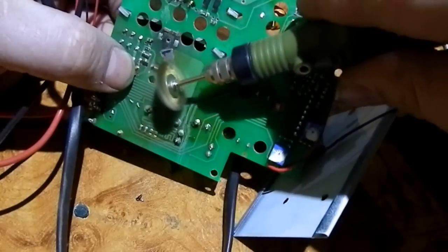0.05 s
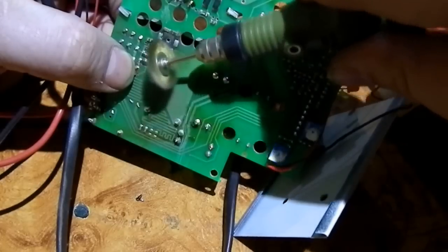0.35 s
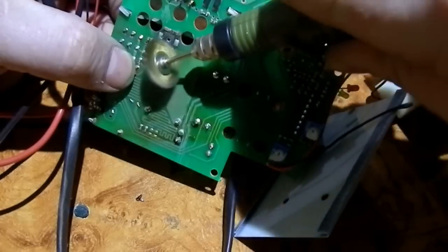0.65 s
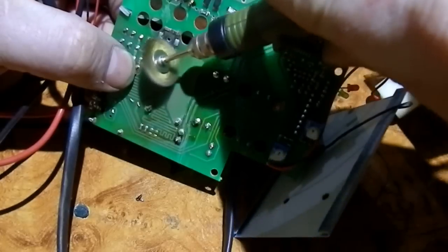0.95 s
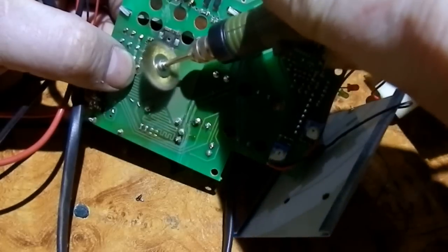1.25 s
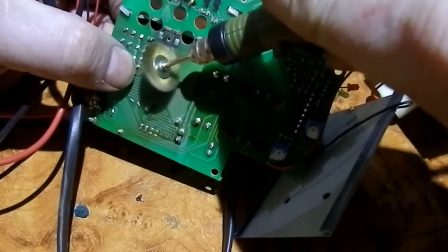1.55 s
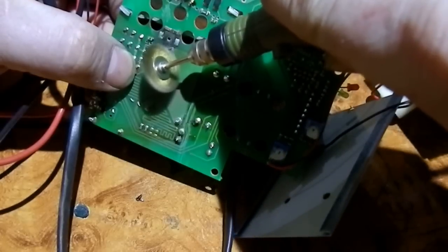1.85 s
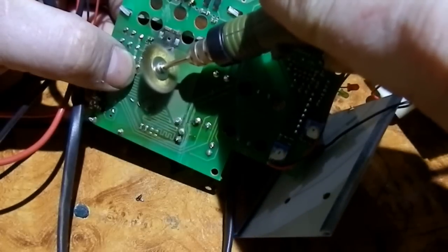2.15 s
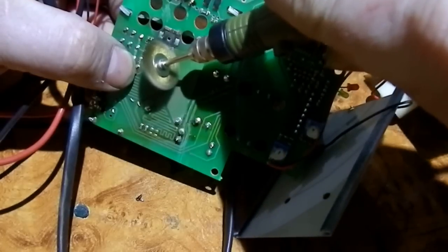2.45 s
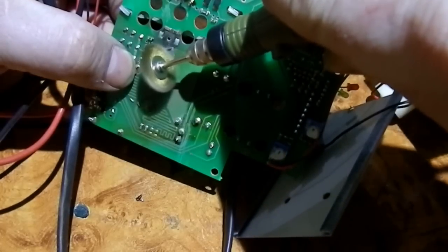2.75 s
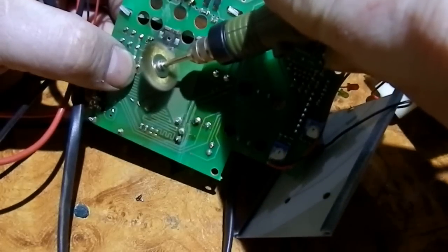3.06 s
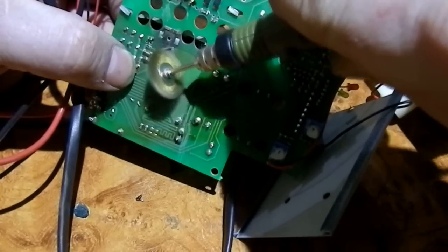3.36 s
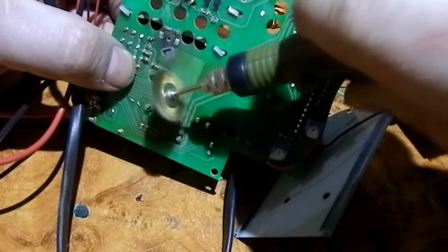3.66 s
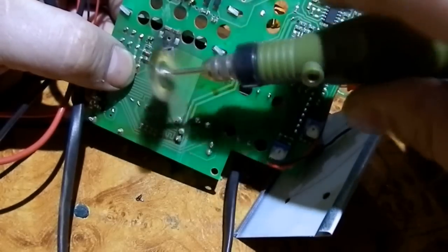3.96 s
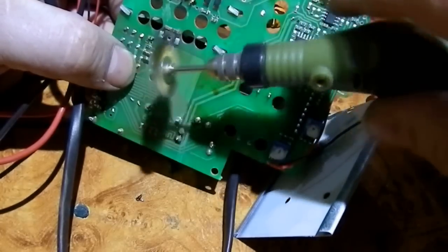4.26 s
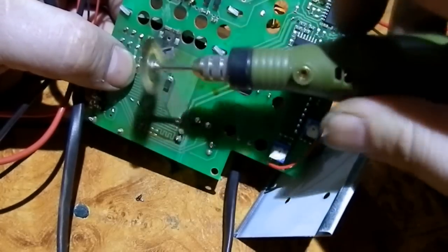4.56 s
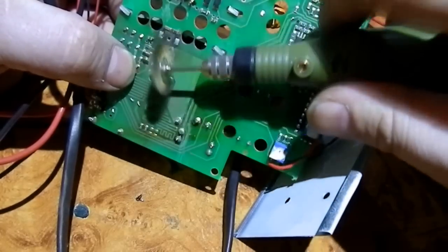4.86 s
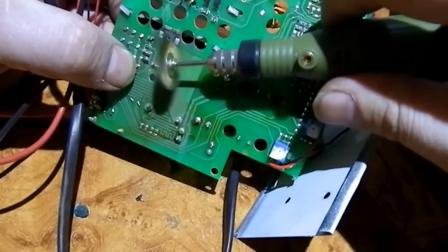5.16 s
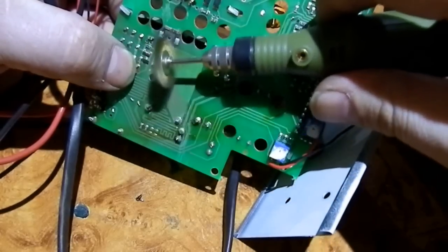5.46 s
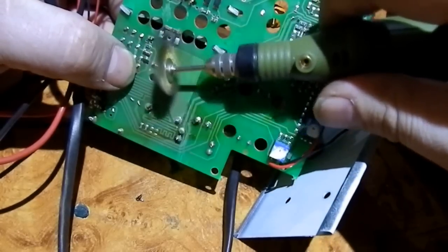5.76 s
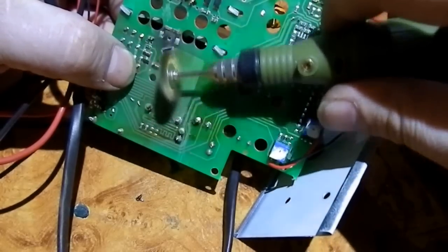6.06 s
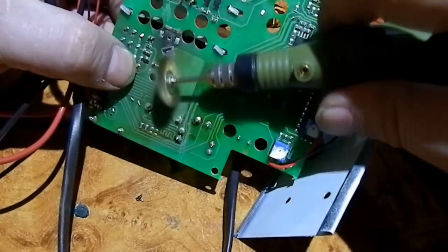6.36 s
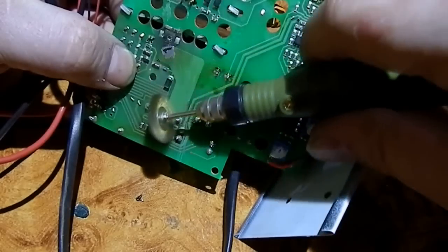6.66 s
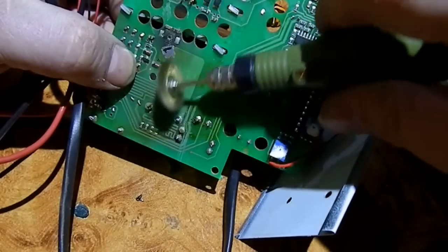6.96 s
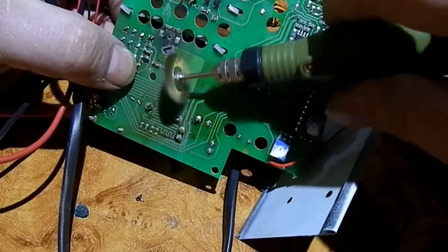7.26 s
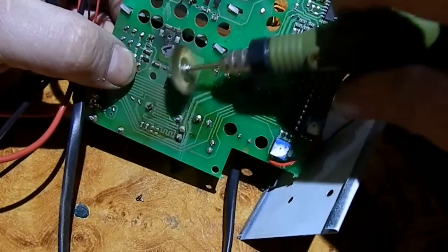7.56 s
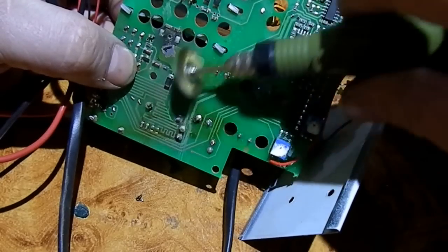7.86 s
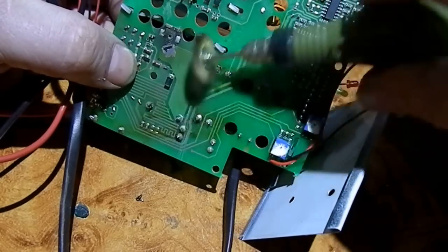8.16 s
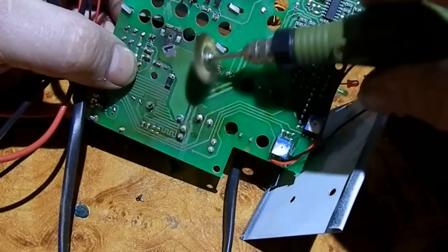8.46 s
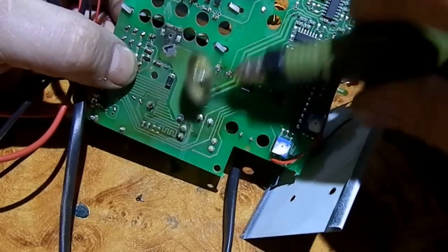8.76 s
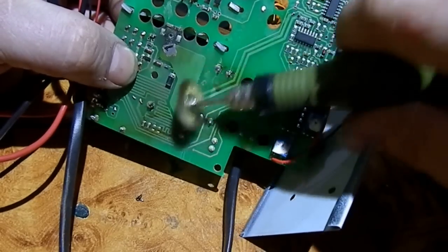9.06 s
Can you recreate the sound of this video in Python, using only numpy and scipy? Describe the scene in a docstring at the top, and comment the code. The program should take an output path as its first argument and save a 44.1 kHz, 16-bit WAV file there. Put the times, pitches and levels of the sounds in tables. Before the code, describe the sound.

Close, bright wire brush hiss on a circuit board, over a small motor that sags under pressure and whines when lifted.

```python
"""Wire wheel on a circuit board

A small rotary tool scrubs a circuit board, heard up close. The weak motor sags whenever the wheel
is pressed down; the board hums and buzzes at multiples of the shaft speed, and the wires hiss and
ring. Midway the wheel lifts and only grazes while the free motor whines. It bites again with a
squeal, then works with its rim in short strokes."""
import sys
import numpy as np
from scipy import signal
from scipy.fft import rfft, irfft, next_fast_len
from scipy.io import wavfile
from scipy.ndimage import uniform_filter1d, map_coordinates

SR = 44100
rng = np.random.default_rng(int(sys.argv[2]) if len(sys.argv) > 2 else 0)


def to_wav(s):
    """Save 16-bit WAV."""
    ch = np.atleast_2d(s).T  # columns
    pcm = np.round(np.clip(ch, -1, 1) * 32767)  # PCM
    wavfile.write(sys.argv[1], SR, pcm.astype(np.int16))


N = 410571
T = np.arange(N) / SR


def amp(db):
    """Decibels to gain."""
    return 10 ** (np.asarray(db) / 20)


def unit(x):
    """Scale to rms 1."""
    return x / np.sqrt(np.mean(x ** 2) + 1e-20)


def steady(x):
    """Hold the rms near 1 at every moment."""
    return x / np.sqrt(np.abs(uniform_filter1d(x * x, size=3000)) + 1e-12)


def along(points, hz):
    """Read (freq_hz, value) points on a log frequency axis."""
    freqs, values = np.transpose(points)
    return np.interp(np.log(hz + 1), np.log(freqs + 1), values)


def curves(rows):
    """One automation curve for each column after the time."""
    times, *columns = np.transpose(rows)
    return [np.interp(T, times, column) for column in columns]


def wobble(rate):
    """A random curve of rms 1 with rate knots a second."""
    knots = rng.standard_normal(int(T[-1] * rate) + 2)
    return unit(np.interp(T * rate, np.arange(len(knots)), knots))


def swell(middle_s, length_s):
    """A smooth rise from 0 to 1 and back."""
    return np.cos(np.pi * np.clip((T - middle_s) / length_s, -.5, .5)) ** 2


def bursts(rows, attack_s, t60_s):
    """An envelope of quick hits that die away."""
    out = np.zeros(N)
    for start_s, db in rows:
        start = int(start_s * SR)
        t = T[:min(SR // 2, N - start)]
        out[start:start + len(t)] += amp(db - 60 * t / t60_s) * (1 - np.exp(-t / attack_s))
    return out


def filtered(x, response):
    """Shape x with a gain at each frequency."""
    size = next_fast_len(N + SR // 2)
    return irfft(rfft(x, size) * response(np.fft.rfftfreq(size, 1 / SR)), size)[:N]


def coloured(x, spectrum, modes=()):
    """A broad EQ curve plus narrow bells (centre_hz, width_hz, gain_db), scaled to rms 1."""
    def bells(hz):
        return sum(db / (1 + (2 * (hz - centre) / width) ** 2) for centre, width, db in modes)
    return unit(filtered(x, lambda hz: amp(along(spectrum, hz) + bells(hz))))


def bristles(turns, memory, size):
    """Roughness around the wheel, size values a turn; each turn partly repeats as the wires bend."""
    fresh = rng.standard_normal((int(turns[-1]) + 2, size))
    pattern = signal.lfilter([1], [1, -np.clip(memory, 0, .98)], fresh, axis=0)
    return unit(map_coordinates(pattern.ravel(), [turns * size], order=3, mode="nearest"))


def harmonics(table, speed, turns, body_db, rough, rate):
    """Multiples of the shaft speed sweep through a body's EQ, each fluttering by itself."""
    out = np.zeros(N)
    for multiple, db in table:
        gain = amp(db + body_db(multiple * speed)) * (1 + rough * wobble(rate))
        out += gain * np.sin(2 * np.pi * (multiple * turns + rng.random()) + rough * wobble(rate))
    return steady(out)


# Shaft speed as the hand leans on the tool, before the strokes: time_s, speed_hz
SHAFT_SPEED = [(0, 143), (.05, 153), (.17, 192), (.23, 193), (.33, 175.5), (.46, 170.9), (.56, 152.2),
               (.73, 170.5), (.85, 140.5), (1.05, 132), (1.17, 97.5), (1.3, 110.4), (1.46, 102.3),
               (1.57, 128.5), (1.74, 114.2), (2.11, 112.6), (2.38, 94), (2.55, 119.5), (2.71, 163),
               (2.93, 145.2), (3.11, 143.3), (3.3, 126), (3.42, 133), (3.5, 175), (3.6, 251), (3.72, 262.4),
               (4.91, 262.9), (4.98, 251), (5.09, 260), (5.41, 194.6), (5.77, 190.2), (5.84, 178),
               (5.98, 198.2), (6.25, 185.9), (6.37, 155.4), (6.52, 146.4), (6.74, 169.5), (7.3, 159.6),
               (7.65, 174.2), (8, 174.3), (8.3, 168), (9.31, 166)]
# Rim strokes drag the shaft and choke the wires: slowest_s, sag_hz, fall_s, recovery_s, choke_db
RIM_STROKES = [(6.853, 11, .056, .177, 1), (7.118, 41, .125, .114, 1), (7.468, 32, .071, .16, 6),
               (7.77, 18, .075, .216, 1), (8.07, 18, .06, .21, 4.5), (8.345, 5, .045, .1, 4),
               (8.482, 15, .14, .073, 0), (8.635, 24, .072, .131, 6), (8.874, 36, .069, .151, 9),
               (9.118, 38, .073, .16, 9)]

def shaft_speed():
    """Turns per second: each stroke drags the weak motor down, then it recovers."""
    speed, = curves(SHAFT_SPEED)
    for s, sag, fall, recovery, _ in RIM_STROKES:
        speed = speed - sag * np.interp(T, [s - fall, s, s + recovery], [0, 1, 0])
    return uniform_filter1d(speed, size=1200, mode="nearest") * (1 + .0007 * wobble(40))


# The grazing wheel skips clear of the board: middle_s, dip_db
WHEEL_SKIPS = [(3.755, 2), (4.275, 4.5), (4.93, 3)]

def wheel_touch(graze):
    """Quick changes of contact in dB: an uneven board, grazing bounces and skips, choking strokes."""
    bounce_hz, lightest_s, choke_lag_s = 13.5, 4.272, 0.0038
    uneven = 0.98 * wobble(27)
    bounce = -graze * np.cos(2 * np.pi * bounce_hz * (T - lightest_s))
    skips = sum(db * swell(s, length_s=0.048) for s, db in WHEEL_SKIPS)
    chokes = sum(db * swell(s + choke_lag_s, length_s=0.11) for s, *_, db in RIM_STROKES)
    return uneven + bounce - skips - chokes


# The held board hums most when the shaft turns near its resonance: speed_hz, level_db
HUM_RESONANCE = [(95, -45), (103, -37), (112, -30), (130, -29.5), (147, -24), (155, -25), (162, -31.5),
                 (173, -50), (260, -56)]

def board_hum(speed, turns, rim, effort_db):
    """Unbalance shakes the board once a turn, harder on the rim."""
    lagged_speed = np.interp(T - 0.019, T, speed)  # the resonance needs time to follow
    level_db = along(HUM_RESONANCE, lagged_speed) + 6 * rim + 1.25 * effort_db + .7 * wobble(30)
    return amp(level_db) * unit(np.sin(2 * np.pi * turns))


# Harmonics of the loaded wheel: shaft_multiple, gain_db
BUZZ_HARMONICS = [(2, -4), (3, 5.5), (4, 11.5), (5, 14.5), (6, 14.5), (7, 8.5), (8, 7.5), (9, 9),
                  (10, 10.5), (11, 6), (12, 6), (13, 9.5), (14, 9.5), (15, 16), (16, 6), (17, 13),
                  (18, 4.5), (20, 6), (21, -24)]
# Body of the board under the flat wheel, and under the rim: freq_hz, gain_db
BOARD_EQ = [(200, -1), (330, -1), (450, 0), (570, 2), (720, -13), (810, -10), (950, -9.5), (1100, -10.5),
            (1300, -3.5), (1600, 0), (1900, -8.5), (2400, -7.5), (3200, -5.5), (5000, 15)]
BOARD_RIM_EQ = [(200, 17), (330, -2), (470, -3.5), (650, 1), (810, 1.5), (950, -13), (1100, -8), (1400, 3),
                (1650, -1.5), (1900, -15), (2400, -11), (3200, 4), (5000, 0)]

def board_buzz(speed, turns, rim, effort_db):
    """The loaded wheel buzzes the board, turning ragged as it grabs or lets go."""
    def body_db(hz):
        return (1 - rim) * along(BOARD_EQ, hz) + rim * along(BOARD_RIM_EQ, hz)
    work_speed_hz, full_drag_hz_per_s = 150, 360
    braking = -np.gradient(speed) * SR
    buzz = harmonics(BUZZ_HARMONICS, speed, turns, body_db, rough=0.29 + np.abs(braking) / 1400, rate=45)
    load_db = 0.68 * effort_db + 1.5 * np.log2(work_speed_hz / speed)
    rim_db = rim * (1 + 4.5 * np.clip(braking / full_drag_hz_per_s, 0, 1))  # swells under braking
    return amp(-28 + load_db + rim_db + 1.3 * wobble(25)) * buzz


# Tone of the ringing wires: freq_hz, gain_db
WIRE_EQ = [(1800, -32), (2500, -32.5), (2880, -7.5), (3280, -7), (3480, -2.5), (3680, -1), (3860, 4.5),
           (4020, -3), (4200, -1), (4430, -3.5), (4620, -18), (6000, -12), (9000, -25)]
# Harmonics of the wires' stick-slip chatter: shaft_multiple, gain_db
SQUEAL_HARMONICS = [(14, -8), (15, 6), (16, 2), (17, -4), (18, -8), (19, 4), (20, -3), (21, -7), (22, -2),
                    (23, 1), (24, -4), (25, -4), (26, 1), (27, 2), (28, -2), (29, 1), (30, -2), (31, 1),
                    (32, -3), (33, -4), (35, -5)]
# The wheel digs in for a moment: middle_s, length_s, hiss_gain_db, ring_gain_db
WHEEL_DIGS = [(.17, .14, -0.5, 3.5), (.35, 0.15, 0.5, 1.5), (1.607, 0.37, -1.5, 2.5), (2.995, .3, 0.5, 2.5),
              (3.25, 0.45, -0.5, 1), (4.955, 0.14, -2.5, 14.5), (5.16, 0.46, -1.5, 5.5),
              (6.817, 0.081, 6.5, 9), (7.257, .2, -0.5, 5.5), (7.44, .07, 6, -1), (7.88, .12, 1.5, 4.5),
              (8.138, 0.066, 1, 4.5)]

def wire_ring(speed, turns, graze, rim, sticking, contact_db):
    """Pressed wires ring near 4 kHz, and squeal when they stick and slip in step with the shaft."""
    level_db = -13 + 0.63 * contact_db + 1.4 * sticking - 25 * graze ** 3 - 11.5 * rim
    level_db += 1.36 * wobble(22)
    level_db += sum(db * swell(s, length) for s, length, _, db in WHEEL_DIGS)
    scrape = bristles(turns, memory=0.51, size=160)
    loose = steady(coloured(scrape, WIRE_EQ, modes=[(3680, 520, 8), (2940, 480, -9)]))
    squeal = harmonics(SQUEAL_HARMONICS, speed, turns, lambda hz: along(WIRE_EQ, hz), rough=0.22, rate=60)
    return amp(level_db) * (np.sqrt(1 - sticking) * loose + np.sqrt(sticking) * squeal)


# Tone of the wheel pressed flat: freq_hz, gain_db
FLAT_EQ = [(100, -20.5), (500, -20), (1600, -14.5), (2400, -13), (3500, -3.5), (4600, 1.5), (5700, -3.5),
           (6600, 1), (8000, 0.5), (9000, -1), (10800, -2.5), (12300, -0.5), (13500, -10), (15600, -12.5)]
# Narrow peaks and notches in that tone: centre_hz, width_hz, gain_db
FLAT_BELLS = [(6380, 360, 4), (7040, 160, -1), (8860, 410, 4.5), (10120, 220, 5), (10920, 190, 4.5),
              (12120, 250, -16)]

def flat_scratch(turns, sticking):
    """Wire tips scratch in tufts that return every turn; sticking locks them into gliding lines."""
    once_a_turn = np.sin(2 * np.pi * turns)
    tufts = amp(1.56 * bristles(turns, memory=0.87, size=12) + 0.42 * once_a_turn + 0.71 * wobble(70))
    loose = unit(tufts * bristles(turns, memory=0.21, size=320))
    locked = unit(amp(2 * once_a_turn) * bristles(turns, memory=.95, size=256))
    lock_share = 0.43 * sticking ** 3
    return coloured(np.sqrt(1 - lock_share) * loose + np.sqrt(lock_share) * locked, FLAT_EQ, FLAT_BELLS)


def shifting_load(x, depth_db):
    """Different wires carry the load from moment to moment, so narrow peaks come and go."""
    spectrogram = signal.stft(x, nperseg=1024)[2]
    peaks = rng.standard_normal(spectrogram.shape)
    peaks = uniform_filter1d(uniform_filter1d(peaks, size=4, axis=0), size=3, axis=0)  # across frequency
    peaks = uniform_filter1d(peaks, size=26, axis=1)  # across time
    return unit(signal.istft(spectrogram * amp(depth_db * unit(peaks)), nperseg=1024)[1][:N])


def brighten(x, top_db, crossover_hz=9500):
    """Sharper contact moves the energy into the top octave."""
    top = filtered(x, lambda hz: 1 / (1 + (crossover_hz / (hz + 1)) ** 10))
    share = np.clip(amp(top_db) ** 2, .02, .9)
    return np.sqrt(1 - share) * unit(x - top) + np.sqrt(share) * amp(-1.5) * unit(top)


def wire_hiss(turns, graze, rim, sticking, effort_db, touch_db):
    """The wires' scratch crossfades between flat, rim and grazing contact; grazing adds ring and ticks."""
    flat = flat_scratch(turns, sticking)
    edge = rim_scratch(turns)
    air, tip_ring, firmness_db = skim(turns, graze)
    pressed = shifting_load(np.sqrt(1 - rim) * flat + np.sqrt(rim) * edge, depth_db=2.47)
    scratch = np.sqrt(1 - graze) * pressed + np.sqrt(graze) * air
    graze_top_db = -2.24 + 1.15 * touch_db + 0.35 * firmness_db  # a firmer graze is brighter
    scratch = brighten(scratch, top_db=-2.5 + graze * graze_top_db)
    digs_db = sum(db * swell(s, length) for s, length, db, _ in WHEEL_DIGS)
    level_db = -11 + effort_db + touch_db + digs_db - .5 * graze
    return amp(level_db) * scratch + tip_ring + stray_catches(air)


# The wheel hits solder joints: start_s, gain_db
SOLDER_HITS = [(0.859, -26), (0.929, -23), (4.599, -16.5), (7.069, -11), (7.439, -13), (8.599, -19),
               (9.084, -13.5)]

def solder_bumps():
    """Solder joints kick the wheel and rattle the board."""
    rattle = coloured(rng.standard_normal(N), BOARD_EQ + [(9000, -40)])
    return amp(0.5) * bursts(SOLDER_HITS, attack_s=0.0031, t60_s=0.13) * rattle


# Harmonics of the free motor: shaft_multiple, gain_db
WHINE_HARMONICS = [(1, -8), (2, -26), (3, -14.5), (4, -18), (5, 0.5), (6, -7), (7, -13.5), (9, -13.5)]
# Fader ride of its whine: time_s, level_db
WHINE_LEVEL = [(3.6, -36.5), (3.94, -30.5), (4.23, -35), (4.5, -31), (5.05, -31.5)]

def motor_whine(speed, turns):
    """Freed of its load, the motor whines at multiples of the shaft speed."""
    level_db, = curves(WHINE_LEVEL)
    return amp(level_db) * harmonics(WHINE_HARMONICS, speed, turns, lambda hz: 0, rough=.13, rate=25)


# Airy tone of the grazing wheel: freq_hz, gain_db
GRAZE_EQ = [(100, -17), (1000, -18), (2800, -16), (4400, -16), (4900, -2), (5800, 2), (6300, 4.5),
            (8700, 7), (10100, 3.5), (11400, 9), (12700, 1), (13200, -9), (14300, -1), (15400, -7)]
# Fader ride of the lightly touching tips, which ring near 5 kHz: time_s, gain_db
TIP_RING_LEVEL = [(3.5, -27), (3.95, -26), (4.07, -16), (4.2, -22.5), (4.3, -37), (4.38, -18.5),
                  (4.55, -19), (4.8, -14.5), (5.15, -14)]

def skim(turns, graze):
    """A grazing wheel touches in spurts; returns whistling air, tip ring and firmness of touch in dB."""
    spurts = unit(amp(1.2 * wobble(55) + 1.7 * wobble(330)))
    air = coloured(spurts * bristles(turns, memory=0.17, size=256), GRAZE_EQ)
    tip_eq = [(4350, -28), (4800, -3), (5250, -5), (5700, -6.5), (6500, -41)]  # freq_hz, gain_db
    tips = coloured(spurts * bristles(turns, memory=0.51, size=160), tip_eq)
    air = unit(air + amp(-2.5) * spurts * whistles(turns))
    tip_db, = curves(TIP_RING_LEVEL)
    firmness_db = tip_db - np.average(tip_db, weights=graze)
    return air, amp(tip_db - 0.5) * graze * tips, firmness_db


# Whistling bands of the skimming wires: shaft_multiple, width_multiples, gain_db
WHISTLE_BANDS = [(24, 1, -2), (29, 1.2, -7), (33, 1.3, -3), (38.8, 1.5, -7), (43, 1.7, 3), (47.3, 1.7, -4),
                 (52.6, 1.7, -5), (58, 2, -10)]

def whistles(turns):
    """Narrow bands of noise ride on high multiples of the shaft speed."""
    out = np.zeros(N)
    for multiple, width, db in WHISTLE_BANDS:
        # a complex flutter spreads each line into a band
        knots = rng.standard_normal((int(turns[-1] * width) + 2, 2)) @ [1, 1j]
        smooth = signal.resample_poly(knots, 8, 1)
        flutter = np.interp(8 * turns * width, np.arange(len(smooth)), smooth)
        out += amp(db) * np.real(flutter * np.exp(2j * np.pi * multiple * turns))
    return unit(out)


# Ticks of stray wires while grazing: start_s, gain_db
CATCH_HITS = [(3.9265, 11), (4.2867, 0), (4.9571, 13)]

def stray_catches(air):
    """Stray wires catch the board in sharp spits of hiss."""
    return amp(-14) * bursts(CATCH_HITS, attack_s=.004, t60_s=0.039) * air


# Tone of the wheel on its rim: freq_hz, gain_db
RIM_EQ = [(100, -10.5), (600, -8.5), (1600, -6.5), (2300, -5.5), (3500, -13), (4600, 7.5), (5800, 1.5),
          (7500, 3), (8600, 9), (10000, 6.5), (12200, 1), (13300, -4), (14500, -4), (15500, -4.5)]
# Narrow resonances on top: centre_hz, width_hz, gain_db
RIM_BELLS = [(4630, 240, 5.7), (6550, 130, 11.3), (8300, 170, 4.3), (8780, 110, 4.5), (9860, 560, 2.6),
             (11700, 200, 2), (12400, 260, 3.7), (15450, 500, 3.2)]

def rim_scratch(turns):
    """Tufts on the rim pulse the hiss in a pattern that nearly repeats each turn."""
    tufts = amp(2.0 * bristles(turns, memory=0.92, size=10))
    return coloured(tufts * rng.standard_normal(N), RIM_EQ, RIM_BELLS)


# Tone of the room: freq_hz, gain_db
ROOM_EQ = [(15, -20), (28, -7), (39, 4), (55, -21), (120, -4.5), (300, -12), (1000, -25), (4000, -24)]

def room_tone():
    """A quiet, low rumble lies under the tool."""
    return amp(-42.5) * coloured(rng.standard_normal(N), ROOM_EQ)


# The wheel lifts until it only grazes: time_s, share_0_to_1
GRAZE_SHARE = [(3.5, 0), (3.56, 1), (5.05, 1), (5.085, .3), (5.25, 0)]
# The wheel tilts onto its rim: time_s, share_0_to_1
RIM_SHARE = [(6.38, 0), (6.6, 0.17), (7.6, 0.33), (8, 0.47), (8.2, 0.73)]
# The wires stick and slip in step with the shaft: time_s, share_0_to_1
STICKING_SHARE = [(0, 0.32), (.2, 0.47), (.5, 0.3), (1.15, 0.01), (1.6, 0.05), (2.6, 0), (2.95, 0.82),
                  (3.3, 0.6), (3.5, 0.2), (5.07, 0.93), (6.2, 0.9), (6.4, 0.34), (7.3, 0.42), (7.65, 0.8),
                  (8, .6), (8.2, 0.1)]
# How hard the wires scrub, driving hum, buzz, ring and hiss: time_s, effort_db
SCRUB_EFFORT = [(0, 1.5), (.4, 1.4), (.9, 1.5), (1.14, -1.5), (1.18, -6), (1.4, 0), (2.45, -2), (2.72, .5),
                (3.1, .5), (3.38, -1), (3.53, 2), (3.62, -1), (4.6, 1), (5.2, 0.5), (5.35, 2.5), (5.7, 0.5),
                (5.92, 1.5), (6.48, 2), (6.54, -4.5), (6.9, -3.5), (7.2, 0), (8.2, 1.2), (9.31, -0.2)]

def scene():
    """One shaft drives the board and the wires, in a quiet room; both channels are the same."""
    speed = shaft_speed()
    turns = np.cumsum(speed) / SR
    graze, rim, sticking = np.clip(curves(GRAZE_SHARE) + curves(RIM_SHARE) + curves(STICKING_SHARE), 0, 1)
    effort_db, = curves(SCRUB_EFFORT)
    touch_db = wheel_touch(graze)
    hum = board_hum(speed, turns, rim, effort_db)
    whine = motor_whine(speed, turns)
    buzz = board_buzz(speed, turns, rim, effort_db)
    ring = wire_ring(speed, turns, graze, rim, sticking, effort_db + touch_db)
    hiss = wire_hiss(turns, graze, rim, sticking, effort_db, touch_db)
    tool = (1 - graze) * (hum + buzz) + graze ** 2 * whine + ring + hiss
    return np.tile(tool + room_tone() + solder_bumps(), (2, 1))


def record(dry):
    """The loudest peaks are softly clipped, and a steep low-pass cuts everything above 15.75 kHz."""
    cutoff_hz = 15750
    rounded = dry / (1 + np.abs(dry) ** 8) ** (1 / 8)
    return np.array([filtered(channel, lambda hz: hz < cutoff_hz) for channel in rounded])


dry = scene()
out = record(dry)
to_wav(out)
```